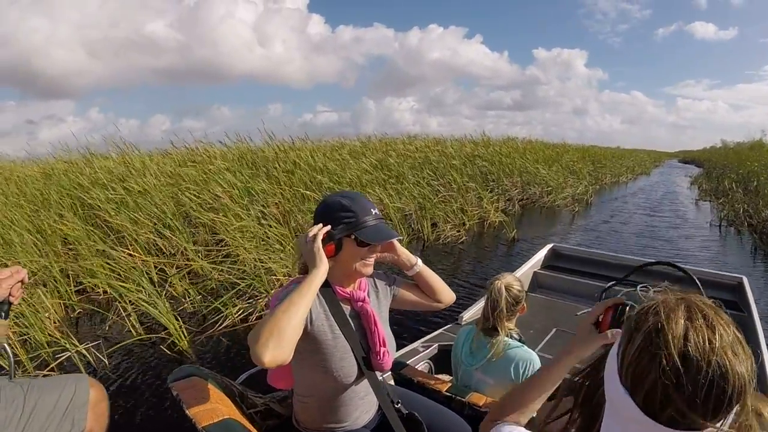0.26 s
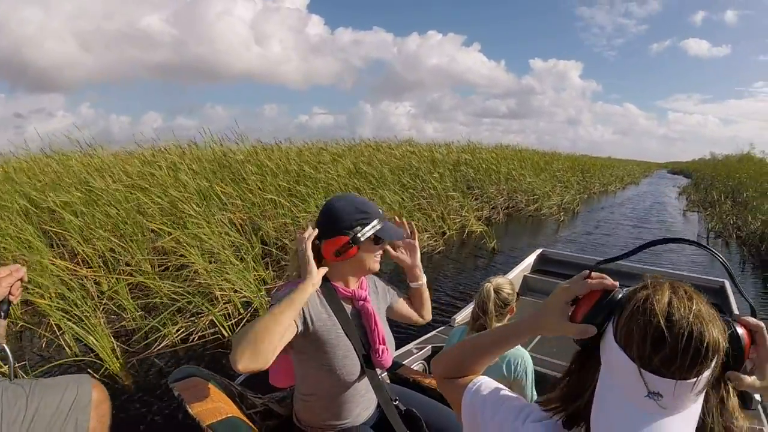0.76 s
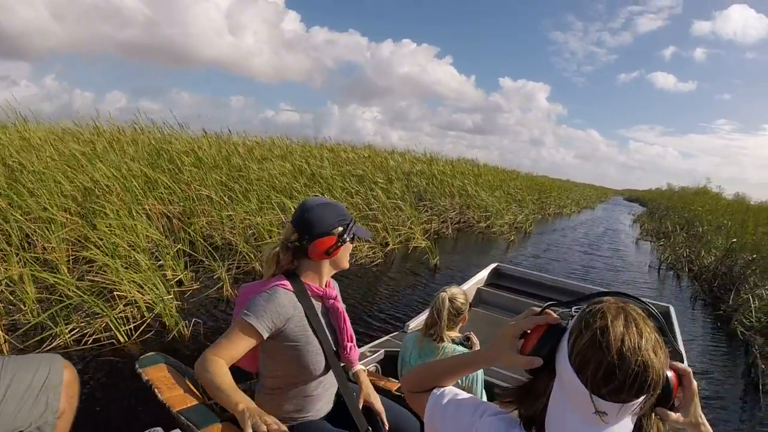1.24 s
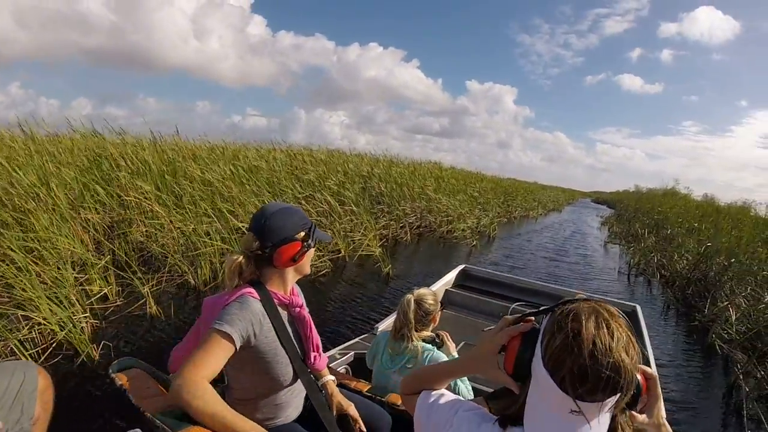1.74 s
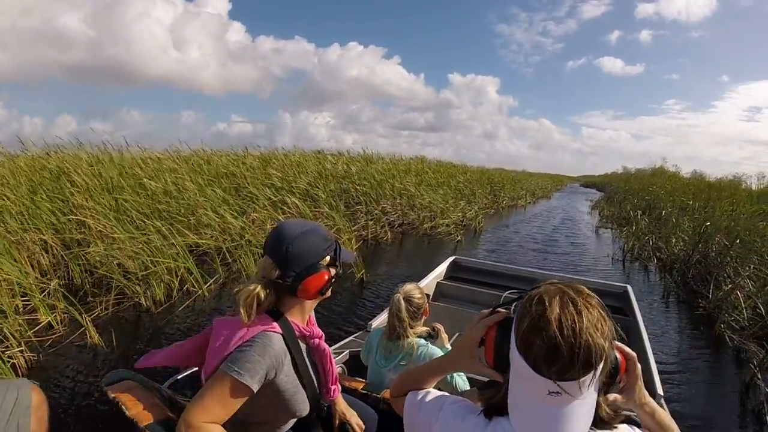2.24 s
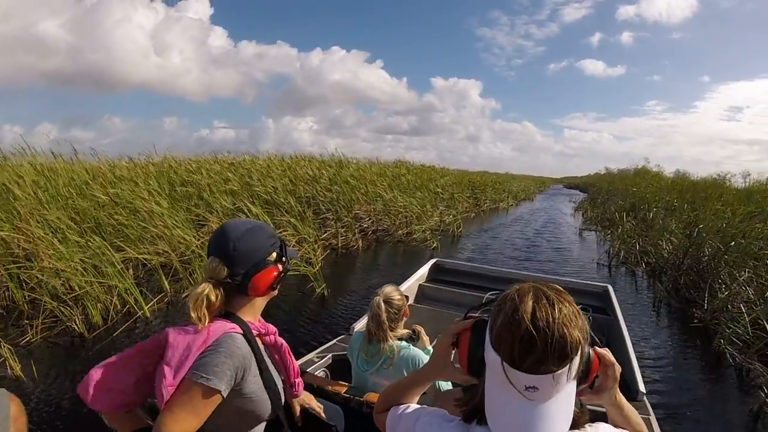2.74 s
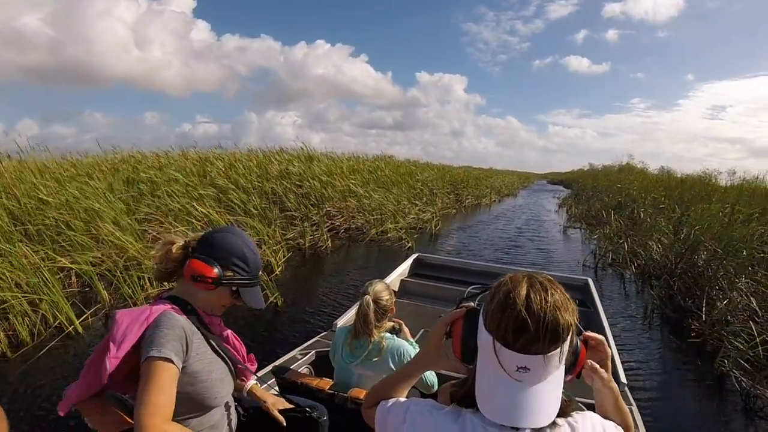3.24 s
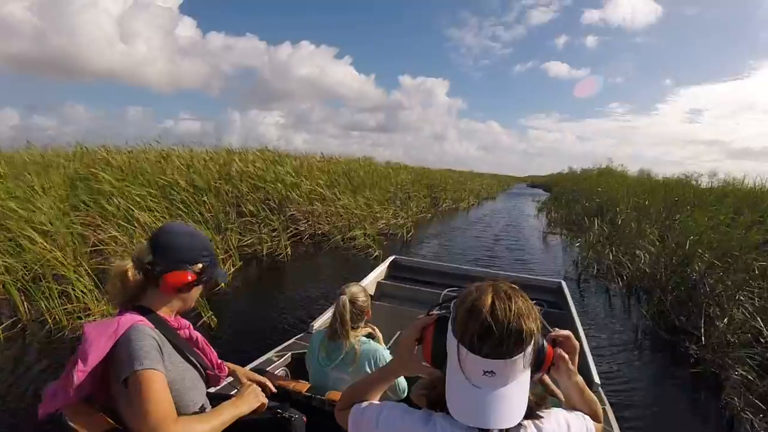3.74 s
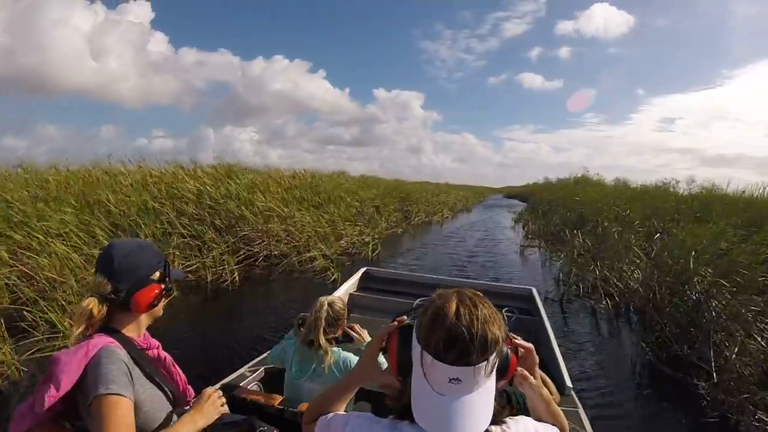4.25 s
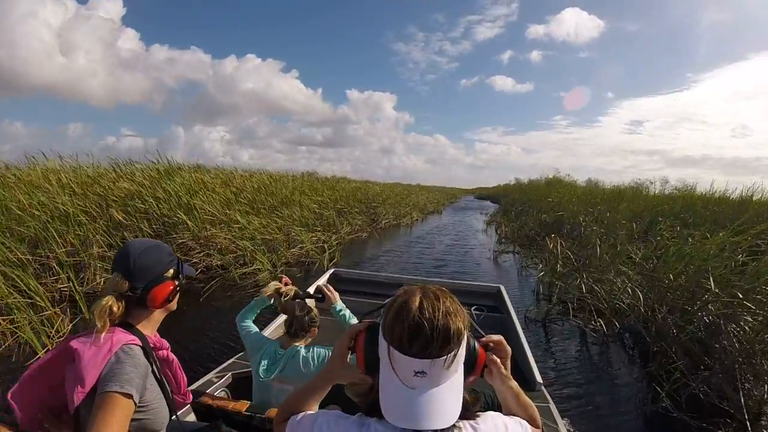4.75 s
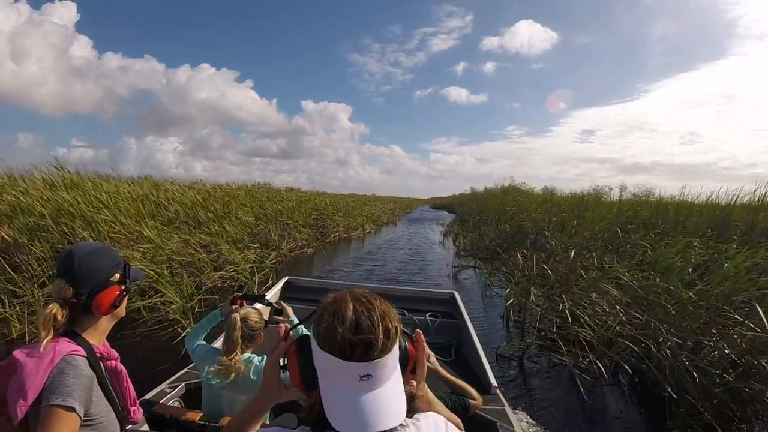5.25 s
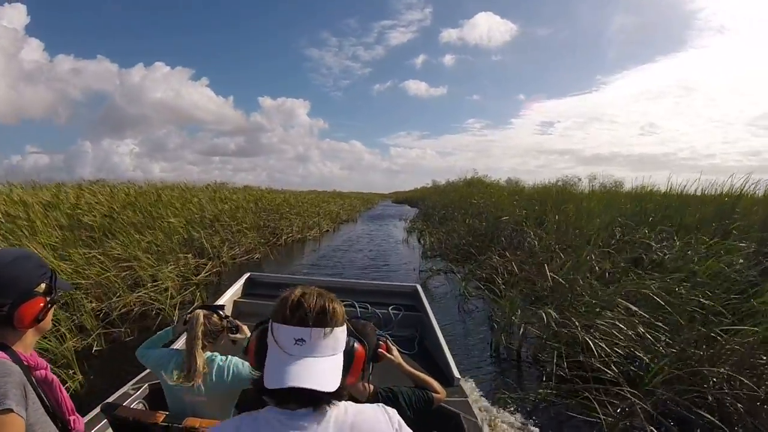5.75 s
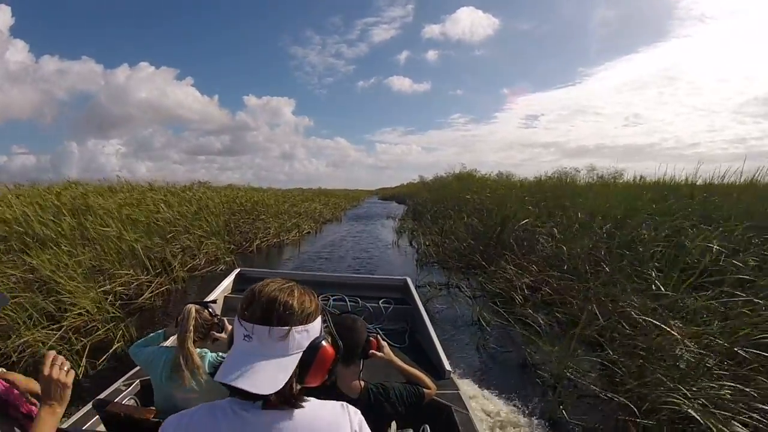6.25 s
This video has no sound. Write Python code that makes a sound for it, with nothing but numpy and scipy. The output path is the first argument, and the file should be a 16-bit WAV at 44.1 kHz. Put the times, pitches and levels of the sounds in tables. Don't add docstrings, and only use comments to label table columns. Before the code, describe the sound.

An airboat's eight-cylinder engine idles with a lumpy low throb, then pulls and opens up to a loud propeller drone with rushing air and spray hiss.

```python
import sys
import numpy as np
from scipy import signal
from scipy.fft import rfft, irfft, next_fast_len
from scipy.io import wavfile
from scipy.ndimage import uniform_filter1d, map_coordinates

SR = 44100
rng = np.random.default_rng(int(sys.argv[2]) if len(sys.argv) > 2 else 0)


def persist_wave(psi):
    counts = np.round(np.clip(psi, -1, 1) * 32767).astype(np.int16)
    wavfile.write(sys.argv[1], SR, np.atleast_2d(counts).T)


def convert_level_to_amplitude(level_db):
    exponent = np.asarray(level_db, float) / 20
    return 10 ** exponent


N = 286749

IDLE_HZ = 11.282
BLADES_PER_CYCLE = 2.621
AIR_KNEE_OCTAVES = 1.27


def unit(x):
    return x / np.sqrt(np.mean(x ** 2) + 1e-20)


def along(points, hz):
    f, v = np.transpose(points)
    return np.interp(np.log(hz + 1), np.log(f + 1), v)


def wobble(rate):
    knots = rng.standard_normal(int(N * rate / SR) + 4)
    return map_coordinates(knots, [np.arange(N) * rate / SR], order=3)


def rush(spectrum, patchy_db):
    z = signal.stft(rng.standard_normal(N + 512), nperseg=512)[2]
    patches = uniform_filter1d(rng.standard_normal(z.shape), size=6, axis=0)
    patches = uniform_filter1d(patches, size=12, axis=1)
    patchy = signal.istft(z * convert_level_to_amplitude(patchy_db * unit(patches)), nperseg=512)[1]
    m = next_fast_len(N + 8192)
    colour = convert_level_to_amplitude(along(spectrum, np.fft.rfftfreq(m, 1 / SR)))
    return unit(irfft(rfft(patchy, m) * colour, m)[:N])


def grown(growth, speed, knee=1.08):
    idle_db, low_db, high_db, strain_db = growth
    octaves = np.log2(speed / IDLE_HZ)
    steady_db = low_db * np.minimum(octaves, knee) + high_db * np.maximum(octaves - knee, 0)
    return idle_db + steady_db + strain_db * np.gradient(octaves) * SR


def engine_speed():
    # t/s, speed gained/Hz, lag/s
    pushes = [
        (0.387, 0.138, 0.104),
        (1.884, 4.218, 0.169),
        (2.871, 2.991, 0.146),
        (3.342, 5.077, 0.137),
        (3.777, 1.324, 0.479),
        (4.569, 10.238, 0.385),
        (5.739, 1.01, 0.071),
    ]
    t = np.arange(N) / SR
    speed = np.full(N, IDLE_HZ)
    for start, gain, lag in pushes:
        u = np.clip(t - start, 0, None) / lag
        speed += gain * (1 - (1 + u) * np.exp(-u))
    return speed


def engine(speed, turn):
    # multiple of the cycle, idle/dB, half throttle/dB, open throttle/dB, flat out/dB
    firing = [(2, -28.5, -46, -17.5, -18.5), (3, -28.5, -22, -21.5, -20), (4, -32.5, -32, -35, -40),
              (5, -12.5, -24, -14.5, -16), (6, -26, -31.5, -35, -18), (7, -39.5, -34, -22.5, -30),
              (8, -12.5, -13, -17.5, -15), (9, -48.5, -30, -31.5, -29.5), (10, -34, -26.5, -31, -26),
              (11, -23, -23.5, -36, -31), (12, -41, -34.5, -46, -54), (13, -23, -28.5, -30.5, -31.5),
              (14, -26.5, -30, -47, -56), (15, -38, -31.5, -47, -46), (16, -34.5, -32.5, -36, -30.5),
              (17, -29.5, -53, -54, -55), (18, -23.5, -45, -41, -46)]
    # f/Hz, level/dB
    pipe = [(25, -11.5), (45, -13), (65, -3), (85, 2.5), (105, 2.5), (125, 3.5), (150, 5.5), (168, 1.5),
            (185, -0.5), (205, -5), (228, -12.5), (260, -5), (300, -5), (430, 0.5)]
    # t/s, opening (0 to 1)
    throttle = [
        (0, 0),
        (1.9, 0),
        (2.4, .5),
        (3.54, .5),
        (3.61, 1),
        (6.5, 1),
    ]
    banks = [1, -1, -1, 1, -1, 1, 1, -1]
    # idle level/dB, rise below knee/(dB/octave), above knee/(dB/octave), strain/(dB s/octave)
    exhaust_growth = (-0.5, 0.74, 0.24, 0.56)
    opening = np.interp(np.arange(N) / SR, *np.transpose(throttle))
    surge = np.clip((speed - 17.6) / (20 - 17.6), 0, 1) ** 2 * np.clip(2 - 2 * opening, 0, 1)
    masked_db = 2.5 * np.maximum(speed - 34.7, 0)
    pull_db = grown(exhaust_growth, speed) + 4 * surge - masked_db
    stage = opening + np.clip((speed - 25) / (33.2 - 25), 0, 1)
    timing = np.angle(np.fft.fft(1 + .5 * np.array(banks) + rng.normal(0, .05, 8)))
    scatter = .4 + .5 * opening ** 2
    out = np.zeros(N)
    for multiple, *pattern_db in firing:
        multiple = round(multiple)
        level_db = pull_db + np.interp(stage, [0, .5, 1, 2], pattern_db) + along(pipe, multiple * speed)
        start = timing[multiple % 8] + .165 * (multiple - 8) ** 2
        drift = start + .08 * scatter * wobble(14)
        out += convert_level_to_amplitude(level_db + 2 + scatter * wobble(7)) * np.cos(multiple * turn + drift)
    return out


def propeller(speed, turn):
    # f/Hz, level/dB
    blade = [(30, 0), (60, 4.5), (95, 13), (185, 8), (240, -1), (300, 6.5), (375, 5.5), (445, -5),
             (500, -7), (565, -1), (650, -9), (800, -10), (1000, -11), (1300, -18)]
    # idle level/dB, rise below knee/(dB/octave), above knee/(dB/octave), strain/(dB s/octave)
    blade_growth = (-45.5, 16, 3, -3)
    load_db = grown(blade_growth, speed)
    dull_db = 0.46 * np.clip(1 - (speed - 11) / 11, 0, 1)
    gust = wobble(8.4)
    out = np.zeros(N)
    for k in range(1, 15):
        level_db = load_db + along(blade, k * BLADES_PER_CYCLE * speed) + 2.5 - dull_db * k
        shake_db = np.clip(.6 + .13 * k, 0, 2) * wobble(11)
        pulse_shape = 1.6 * k - .27 * k * k
        lag = .022 * k * gust + (.1 + .018 * k) * wobble(10) + pulse_shape
        out -= convert_level_to_amplitude(level_db + shake_db) * np.cos(k * BLADES_PER_CYCLE * turn + lag)
    return out


def generator(speed, turn):
    # idle level/dB, rise below knee/(dB/octave), above knee/(dB/octave), strain/(dB s/octave)
    whine_growth = (-50, 1, 6, 2.5)
    poles_per_cycle = 96
    whine_db = grown(whine_growth, speed) + 4.0 + 0.91 * wobble(11)
    phase = poles_per_cycle * turn + .35 * wobble(25) + .5 * np.sin(turn)
    whine = convert_level_to_amplitude(whine_db) * np.sin(phase)
    settled = 1 / (1 + np.exp((1.15 - np.arange(N) / SR) / .08))
    octaves = np.log2(speed / IDLE_HZ)
    pull_db = 5.5 * np.clip(octaves / 0.25, 0, 1) - 25 * np.maximum(octaves - .55, 0)
    octave_db = -53.5 - 8 * settled + pull_db + 3 + 2.5 * wobble(9)
    octave = convert_level_to_amplitude(octave_db) * np.sin(2 * poles_per_cycle * turn + .9 * wobble(20))
    return whine + octave


def brightening(idle, full, share):
    return np.sqrt(1 - share) * rush(idle, patchy_db=0.5) + np.sqrt(share) * rush(full, patchy_db=0.87)


def fastness(speed):
    return np.clip((speed - 11.6) / 13, 0, 1)


def wash(speed, turn):
    # f/Hz, level/dB
    wash_idle = [(140, -54), (230, -4), (255, -4.5), (366, -8.5), (492, -13), (834, -19.5), (1090, -18.5),
                 (1340, -24.5), (2690, -28.5), (2950, -27.5), (5000, -51), (6500, -66), (11000, -120)]
    wash_fast = [(120, -42), (200, -7.5), (280, -7.5), (420, -6.5), (520, -10), (700, -12), (1360, -18.5),
                 (3800, -27), (5000, -36.5), (6500, -65), (11000, -120)]
    # idle level/dB, rise below knee/(dB/octave), above knee/(dB/octave), strain/(dB s/octave)
    wash_growth = (-34.5, 8, 0.5, 0.5)
    throb_db = 0.18 * np.cos(BLADES_PER_CYCLE * turn)
    level_db = grown(wash_growth, speed, AIR_KNEE_OCTAVES) + 3.0 + throb_db
    return convert_level_to_amplitude(level_db) * brightening(wash_idle, wash_fast, fastness(speed))


def spray(speed, turn):
    # f/Hz, level/dB
    hiss_idle = [(2000, -24.5), (3500, -4), (4300, -5.5), (5600, -8), (6400, -8.5), (7000, -13.5),
                 (9000, -21.5), (11000, -29), (13000, -40.5), (14300, -43), (15200, -48.5), (16000, -120)]
    hiss_fast = [(2000, -32), (3500, -11), (5100, -8.5), (6400, -7), (8000, -12.5), (10000, -16.5),
                 (11300, -22.5), (13300, -26), (14300, -28), (15200, -43.5), (16000, -120)]
    # idle level/dB, rise below knee/(dB/octave), above knee/(dB/octave), strain/(dB s/octave)
    hiss_growth = (-47.5, 5.8, -3.5, 0.7)
    throb_db = 0.32 * np.cos(BLADES_PER_CYCLE * turn)
    level_db = grown(hiss_growth, speed, AIR_KNEE_OCTAVES) + 0.84 + throb_db
    return convert_level_to_amplitude(level_db) * brightening(hiss_idle, hiss_fast, fastness(speed) ** 0.63)


def wind_buffet(speed):
    # f/Hz, level/dB
    buffet = [(15, -10), (28, -2), (42, -3), (65, -9), (120, -10), (200, -11), (300, -20), (500, -40),
              (1500, -120)]
    # idle level/dB, rise below knee/(dB/octave), above knee/(dB/octave), strain/(dB s/octave)
    buffet_growth = (-38, 4, 4.5, .3)
    # t/s, strength/dB, half length/s
    gusts = [
        (0.25, -3, 0.087),
        (0.45, 11, .07),
        (0.717, 6, 0.089),
        (1.802, 9.5, 0.14),
        (2.08, 8, 0.12),
        (2.27, 14, 0.12),
        (3.1, 3, 0.13),
        (3.8, 5, 0.16),
        (5.3, 4, .3),
    ]
    t = np.arange(N) / SR
    level_db = grown(buffet_growth, speed) + 2.5 + .8 * wobble(10)
    for middle, strength_db, half in gusts:
        level_db += strength_db * np.exp(-((t - middle) / half) ** 2)
    return convert_level_to_amplitude(level_db) * rush(buffet, patchy_db=.8)


def scene():
    speed = engine_speed()
    turn = 2 * np.pi * np.cumsum(speed) / SR
    machine = engine(speed, turn) + propeller(speed, turn) + generator(speed, turn)
    air = wash(speed, turn) + spray(speed, turn) + wind_buffet(speed)
    return (machine + air)[None]


def low_pass(x):
    return signal.sosfilt(signal.butter(12, 15150, fs=SR, output="sos"), x)


def record(dry):
    power = np.abs(uniform_filter1d(dry ** 2, size=1800, axis=1)) + 1e-6
    held = dry * (power / convert_level_to_amplitude(-18)) ** -.1
    held = held / (1 + np.abs(held / .97) ** 8) ** (1 / 8)
    return low_pass(held)


dry = scene()
out = record(dry)
persist_wave(out)
```